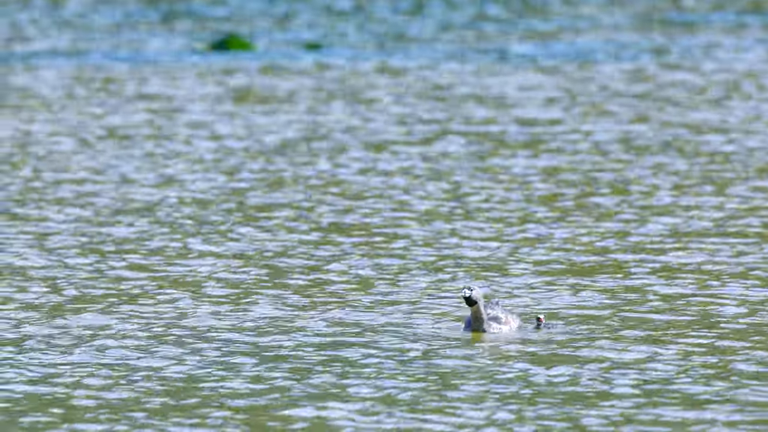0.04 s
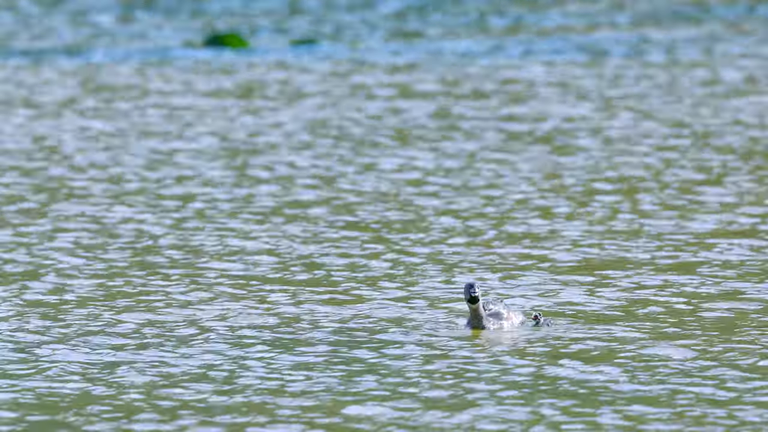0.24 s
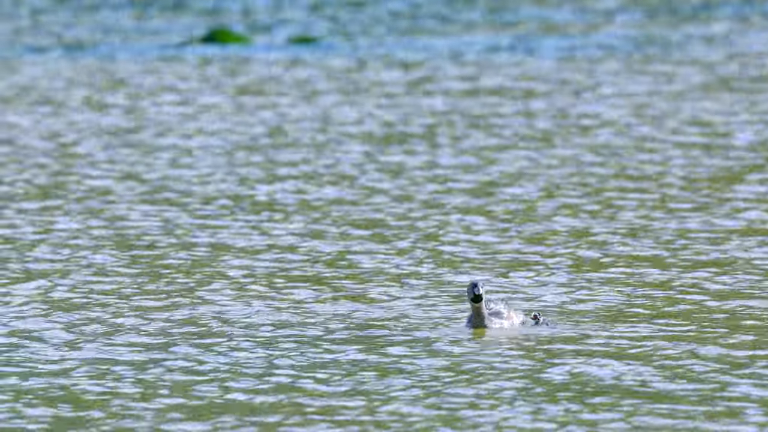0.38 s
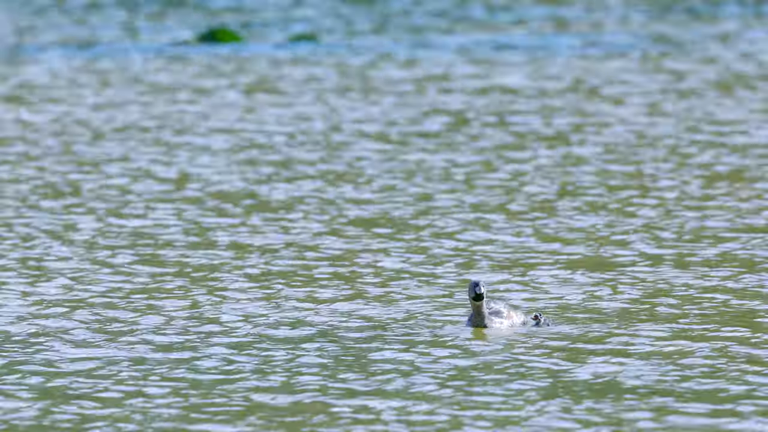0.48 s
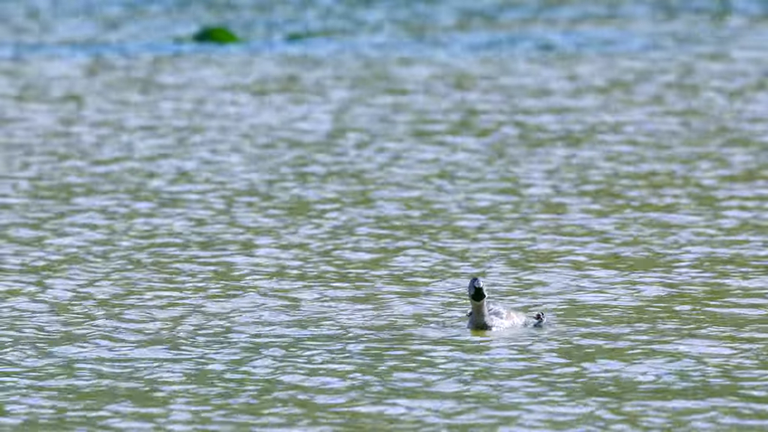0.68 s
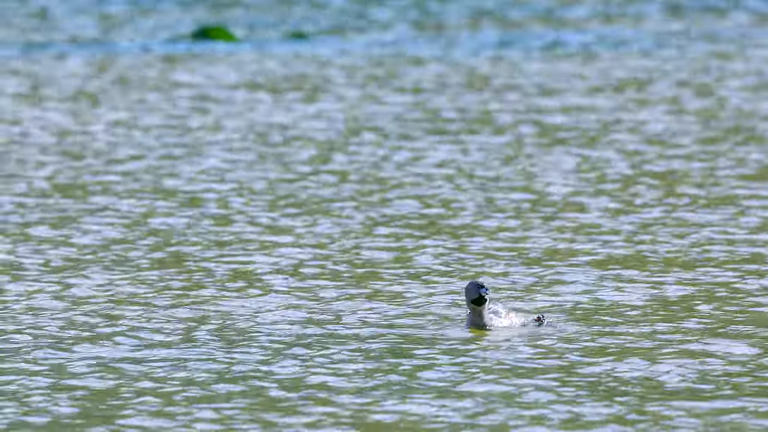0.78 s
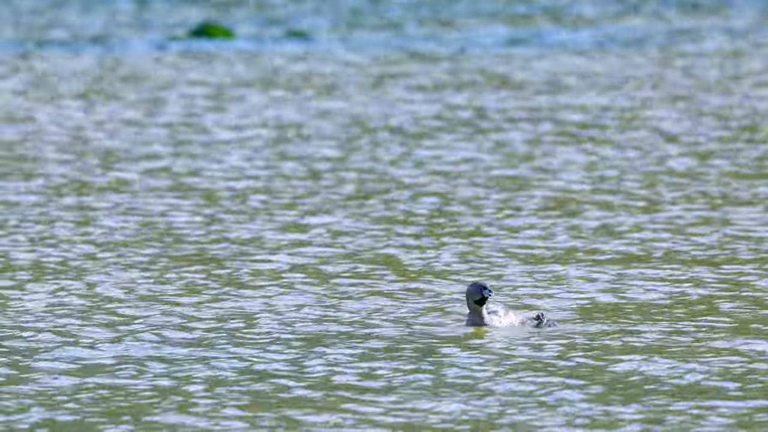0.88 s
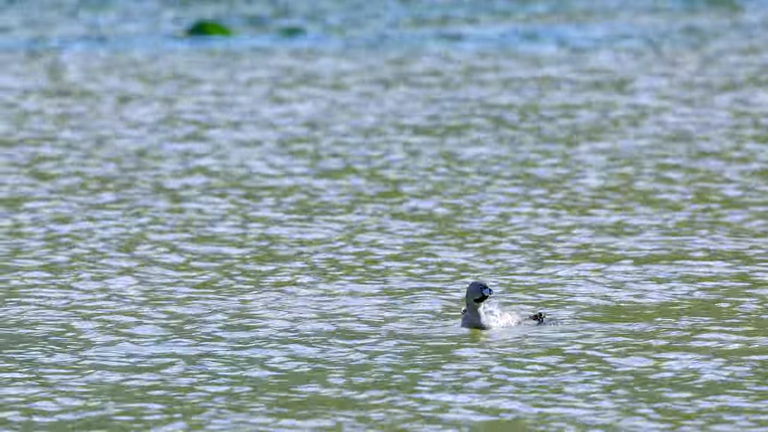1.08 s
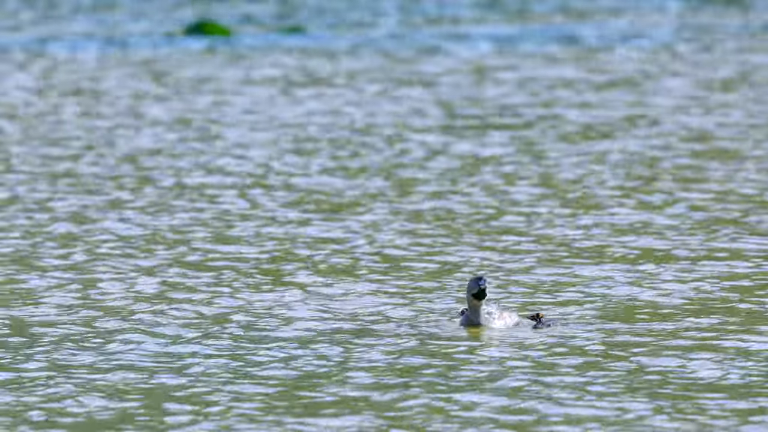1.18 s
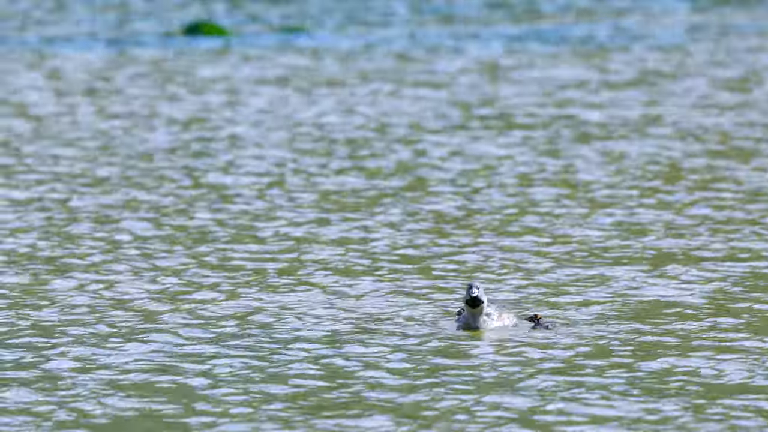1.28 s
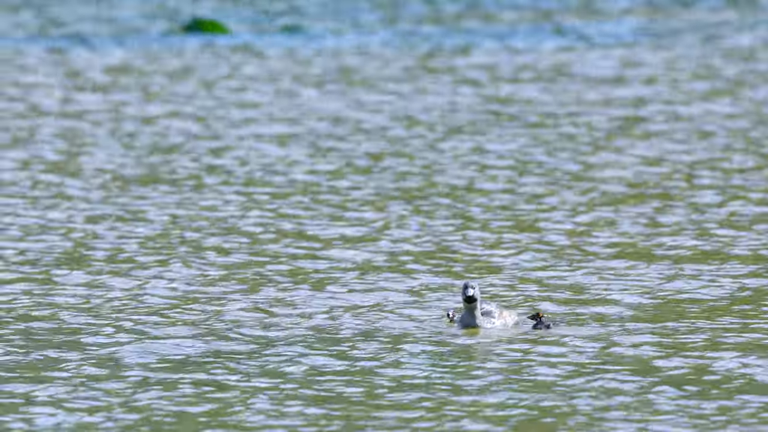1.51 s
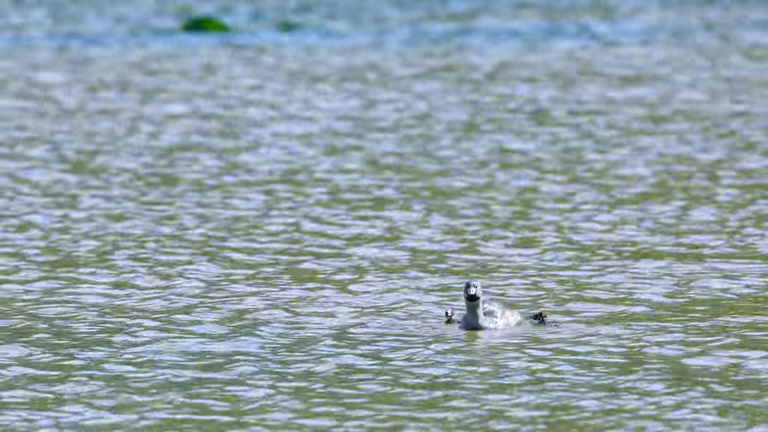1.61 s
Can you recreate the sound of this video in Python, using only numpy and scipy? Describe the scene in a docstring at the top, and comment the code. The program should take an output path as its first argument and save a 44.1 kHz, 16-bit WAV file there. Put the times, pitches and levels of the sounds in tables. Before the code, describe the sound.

A waterbird honks three times, each honk breaking into a rasp, over soft lake ripples.

```python
"""A waterbird calls three times on an open lake: a hollow, almost pure honk each time, breaking
into a falling rasp or into a rasp and a low croak. The honk is a tone with weak overtones; rasp
and croak are uneven syrinx pulses ringing the throat. Behind them: small splashes, faint chirps
of far songbirds, a soft wash of wind and ripples and a thin electrical whine."""
import sys
import numpy as np
from scipy import signal
from scipy.fft import rfft, irfft
from scipy.io import wavfile
from scipy.ndimage import uniform_filter1d

SR = 44100
rng = np.random.default_rng(int(sys.argv[2]) if len(sys.argv) > 2 else 0)


def unload_wav(signal):
    """Save mono or channel-first audio to the path in sys.argv[1] as 16-bit WAV at rate SR, clipped to [-1, 1]."""
    wavfile.write(
        sys.argv[1],
        SR,
        np.round(np.clip(np.atleast_2d(signal).T, -1, 1) * 32767).astype(np.int16),
    )


N = 72765


# One curve per honk: t/s, f/Hz, level/dB, 2nd harmonic/dB, step per higher harmonic/dB
HONK_CURVES = [
    [(.2155, 830, -46, -52, -6), (.218, 850, -30, -44, -6), (.221, 868, -21.5, -40, -8),
     (.228, 890, -13.4, -39, -7), (.237, 901, -10.1, -35.5, -7), (.246, 902, -9.3, -33.5, -8),
     (.256, 878, -11.9, -34, -1.5), (.267, 826, -21.4, -34, 1.4), (.274, 808, -31, -38, -2),
     (.282, 800, -46, -52, -3)],
    [(.781, 750, -44, -56, -6), (.789, 795, -27, -41, -8), (.797, 820, -21, -45, -5),
     (.803, 935, -19.3, -42, -7), (.812, 918, -20, -38, -6), (.824, 875, -21.5, -42, -3),
     (.831, 825, -27, -46, -6), (.846, 820, -33, -58, -6), (.857, 815, -42, -62, -6)],
    [(1.253, 770, -44, -56, -6), (1.261, 805, -25.5, -43, -7), (1.268, 815, -21.7, -45, -7),
     (1.274, 835, -26, -52, -5), (1.278, 1000, -20.5, -36, -8), (1.291, 965, -22.5, -32, -14),
     (1.304, 890, -25.5, -46, -8), (1.313, 840, -35, -52, -6), (1.322, 800, -44, -60, -6)],
]

def honk(curve, cutoff_hz=3700, jitter=0.0055, shimmer=0.15):
    """A strong fundamental that jumps up and sags, with weak, slightly unsteady overtones."""
    start_s, (hz, db, second_db, step_db) = controls(curve)
    phase = 2 * np.pi * np.cumsum(hz * (1 + jitter * wobble(len(hz), rate_hz=890))) / SR
    tone = amp(db) * np.sin(phase)
    for k in range(2, 8):
        gain = amp(second_db + (k - 2) * step_db) / (1 + (k * hz / cutoff_hz) ** 24)
        flutter = 1 + shimmer * wobble(len(hz), rate_hz=140)
        tone += gain * flutter * np.sin(k * phase)
    return start_s, np.sqrt(2) * tone


# One curve per rasp: t/s, f/Hz, level/dB
RASP_CURVES = [
    [(.322, 570, -47), (.334, 535, -39), (.338, 525, -31), (.352, 485, -28), (.359, 465, -30.5),
     (.365, 440, -25.5), (.373, 425, -33), (.382, 410, -48)],
    [(.966, 620, -48), (.979, 570, -38), (.990, 475, -37), (1.003, 430, -28), (1.012, 410, -35.5),
     (1.032, 380, -49)],
    [(1.281, 640, -40), (1.299, 605, -30), (1.310, 490, -29.5), (1.318, 430, -26.5), (1.327, 390, -29),
     (1.333, 380, -38), (1.345, 370, -48)],
]
# One row per rasp: roughness, tilt/(dB/octave), bill gain/dB, bill start f/Hz, bill end f/Hz
RASP_TIMBRES = [(0.57, 0.2, 0.5, 2840, 2560), (0.54, 0, 0.5, 1930, 2550), (0.23, -.5, 4, 2370, 2150)]
# Throat response: f/Hz, relative gain/dB
RASP_THROAT_EQ = [(200, -28), (480, -5.5), (700, -5.5), (1000, -5.5), (1300, -1), (1800, -8), (2200, 0.5),
                  (2620, -3.5), (2850, -4.5), (3150, -23), (3850, -21), (4600, -36), (15000, -61)]

def rasp(curve, roughness, tilt_db_oct, bill_db, bill_start_hz, bill_end_hz):
    """Rough falling pulses through a bright throat and the gliding resonance of the open bill."""
    start_s, (hz, db) = controls(curve)
    throat = [(f, gain_db + tilt_db_oct * np.log2(f)) for f, gain_db in RASP_THROAT_EQ]
    pulses = syrinx(hz, jitter=0.091 * roughness, roughness=roughness)
    voice = colour(pulses, throat)
    bill_hz = np.linspace(bill_start_hz, bill_end_hz, len(hz))
    bill = resonate(voice, bill_hz, width_hz=390).real
    return start_s, amp(db) * unit(voice + amp(bill_db) * bill)


# One curve per croak: t/s, f/Hz, level/dB, throat resonance f/Hz
CROAK_CURVES = [
    [(.846, 245.5, -48, 674), (.861, 234.8, -27, 585), (.878, 241, -28, 546), (.895, 247, -30, 577),
     (.910, 212, -26.5, 606), (.923, 204, -33.5, 656), (.934, 167, -36, 523), (.946, 171, -78, 560)],
    [(1.318, 238.5, -32.5, 730), (1.335, 239.9, -31.5, 580), (1.360, 247.5, -28, 550),
     (1.380, 240, -29, 566), (1.398, 208.8, -27.5, 633), (1.407, 211, -36.5, 606), (1.417, 192, -39, 596)],
]
# Throat response around that resonance: f/Hz, relative gain/dB
CROAK_THROAT_EQ = [(100, -14), (230, -0.5), (500, 0.5), (1200, -0.5), (1700, 6.5), (2700, -11), (5000, 8),
                   (8000, -25)]

def croak(curve):
    """Slow pulses ring one low, moving throat resonance."""
    start_s, (hz, db, throat_hz) = controls(curve)
    pulses = syrinx(hz, jitter=0.014, roughness=0.22)
    ring = resonate(pulses, throat_hz, width_hz=78).imag
    return start_s, amp(db) * unit(colour(ring, CROAK_THROAT_EQ))


def syrinx(hz, jitter, roughness):
    """Uneven pulses of the bird's voice organ, each with a puff of noise."""
    cycles = np.cumsum(hz * (1 + jitter * wobble(len(hz), rate_hz=200))) / SR
    buzz = sum(np.cos(2 * np.pi * k * cycles) for k in range(1, 32))
    puffs = (0.18 + np.exp(-(cycles % 1) / 0.65)) * noise(len(hz))
    return unit(unit(buzz) + 2 * roughness * unit(puffs))


# Small splashes: t/s, rise/s, decay/s, level/dB
SPLASHES = [(.098, 0.007, 0.011, -39), (0.817, 0.0026, 0.0047, -35.5), (0.888, 0.0019, 0.0053, -34.5),
            (.935, 0.0016, 0.0079, -38)]
# Splash spectrum: f/Hz, relative level/dB
SPLASH_EQ = [(100, -14.5), (300, -5), (1000, 5.5), (1700, 2.5), (2700, 4), (3400, -21.5), (5000, -12),
             (8000, -32.5), (15000, -48.5)]

def splash(start_s, rise_s, decay_s, db):
    """Lapping water: a soft noise burst that rises, holds and decays."""
    t = np.arange(SR // 2) / SR
    attack = np.minimum(t / rise_s, 1)
    decay = np.exp(-np.maximum(t - 2 * rise_s, 0) / decay_s)
    return start_s, amp(db) * attack * decay * unit(colour(noise(len(t)), SPLASH_EQ))


# Songbird chirps: t/s, length/s, start f/Hz, end f/Hz, level/dB, waver/fraction of pitch
SONGBIRD_CHIRPS = [(0.065, 0.087, 5350, 5290, -54, 0.0024), (.09, 0.13, 5590, 5660, -61, 0.019),
                   (.215, .05, 5430, 5270, -58, .005), (.42, 0.067, 2620, 2980, -50, .005),
                   (0.492, 0.14, 6900, 7160, -68, .012), (.61, 0.027, 3620, 3370, -53, .008),
                   (.658, 0.033, 5080, 4420, -58, 0.0065), (0.686, 0.083, 3550, 3460, -51, 0.0027),
                   (0.689, 0.072, 4020, 4000, -57, .004), (0.921, 0.06, 4580, 3500, -53, 0.046),
                   (1.14, .05, 4410, 3880, -50, 0.052), (1.161, 0.11, 2496, 3090, -49.5, 0.011),
                   (1.363, 0.038, 3880, 4010, -51, 0.0053), (1.37, 0.19, 3540, 3500, -56, 0.0176),
                   (1.543, 0.036, 2840, 2690, -50, .008), (1.595, 0.0547, 4370, 3570, -54.5, .018)]

def chirp(start_s, length_s, start_hz, end_hz, db, waver):
    """A far songbird's thin, wavering glide."""
    progress = np.arange(0, length_s, 1 / SR) / length_s
    glide_hz = start_hz + (end_hz - start_hz) * progress
    hz = glide_hz * (1 + waver * wobble(len(progress), rate_hz=99))
    envelope = amp(db) * np.sin(np.pi * progress)
    return start_s, envelope * np.sqrt(2) * np.sin(2 * np.pi * np.cumsum(hz) / SR)


def shore_echo(x, db, t60_s, delay_s=0.014):
    """Weak, short scatter from water and bank."""
    t = np.arange(SR // 2) / SR
    tail = noise(len(t)) * amp(-60 * t / t60_s) * (t > delay_s)
    return amp(db) * signal.fftconvolve(x, tail / np.linalg.norm(tail))[:N]


# Wind and ripple spectrum: f/Hz, relative density/dB
WASH_SPECTRUM = [(25, -49.5), (60, -23.5), (120, -2.5), (180, -1.5), (270, 1.5), (340, -6), (440, -10),
                 (650, -8), (870, -6.5), (1400, -13.5), (1800, -10.5), (2450, -11), (3100, -16),
                 (3700, -17.5), (6000, -26.5), (9000, -32), (15500, -37)]
# Stereo image: f/Hz, left-right correlation
WASH_CORRELATION = [(30, 0.91), (250, .97), (1200, 1), (2500, 0.98), (5000, 1), (9000, .55), (14000, .43)]

def wind_and_ripples(db=-42.5, patch_db=1.38, flicker_db=0.26):
    """A wash of noise with drifting patches, nearly mono below the treble."""
    frames, hz = N // 256 + 5, np.fft.rfftfreq(1024, 1 / SR)
    mid_re, mid_im, side_re, side_im, patches = rng.standard_normal((5, frames, len(hz)))
    patches = uniform_filter1d(patches, size=10, axis=0)
    patches = unit(uniform_filter1d(patches, size=8, axis=1))
    flicker = rng.standard_normal((frames, 1))
    correlation = np.clip(read(WASH_CORRELATION, hz), 0, 0.999)
    mid = np.sqrt(1 + correlation) * (mid_re + 1j * mid_im)
    side = np.sqrt(1 - correlation) * (side_re + 1j * side_im)
    gain = amp(read(WASH_SPECTRUM, hz) + patch_db * correlation * patches + flicker_db * flicker)
    spectra = np.array([mid + side, mid - side]) * gain
    _, wash = signal.istft(spectra.transpose(0, 2, 1), nperseg=1024, noverlap=768)
    return amp(db) * unit(wash[:, :N])


# Steady tones: f/Hz, level/dB
WHINE_TONES = [(885, -60), (1222, -60), (4522, -68), (5092, -68.5), (9078, -74.5), (9648, -78),
               (11892, -76.5)]

def whine():
    """Faint steady tones, mostly a thin electrical whine."""
    t = np.arange(N) / SR
    tones = (amp(db) * np.sin(2 * np.pi * (hz * t + rng.random())) for hz, db in WHINE_TONES)
    return np.sqrt(2) * sum(tones)


def amp(db):
    """Decibels to gain."""
    return 10 ** (np.asarray(db) / 20)


def unit(x):
    """Scales to rms 1."""
    return x / np.sqrt(np.mean(x ** 2) + 1e-20)


def read(points, hz):
    """Interpolates (f/Hz, value) points on a log-frequency axis."""
    f, value = np.transpose(points)
    return np.interp(np.log(hz + 1), np.log(f + 1), value)


def controls(curve):
    """Start time and per-sample columns of a curve."""
    times_s, *columns = np.transpose(curve)
    t = np.arange(times_s[0], times_s[-1], 1 / SR)
    return times_s[0], [np.interp(t, times_s, column) for column in columns]


def add(mix, start_s, sound):
    """Mixes a sound in at its start time."""
    part = mix[max(round(start_s * SR), 0):][:len(sound)]
    part += sound[:len(part)]


def noise(size):
    """White noise."""
    return rng.standard_normal(N)[:size]


def wobble(size, rate_hz):
    """Smooth random motion up to a rate."""
    rolloff = 1 + (np.fft.rfftfreq(N, 1 / SR) / rate_hz) ** 4
    return unit(irfft(rfft(noise(N)) / rolloff, N))[:size]


def colour(x, eq):
    """Minimum-phase filter: its peaks ring on after each pulse."""
    log_gain = np.log(amp(read(eq, abs(np.fft.fftfreq(SR, 1 / SR)))))
    response = np.exp(np.conj(signal.hilbert(log_gain)))
    taps = np.fft.ifft(response).real[:2048]
    return signal.fftconvolve(x, taps)[:len(x)]


def resonate(x, hz, width_hz):
    """Moving resonance of gain 1; complex, so either phase can be taken."""
    carrier = np.exp(2j * np.pi * np.cumsum(hz) / SR)
    pole = np.exp(-np.pi * width_hz / SR)
    return 2 * carrier * signal.lfilter([1 - pole], [1, -pole], x / carrier)


def scene():
    """The bird straight ahead, the lake all around."""
    near, far = np.zeros(N), np.zeros(N)
    for curve in HONK_CURVES:
        add(near, *honk(curve))
    for curve, timbre in zip(RASP_CURVES, RASP_TIMBRES):
        add(near, *rasp(curve, *timbre))
    for curve in CROAK_CURVES:
        add(near, *croak(curve))
    for row in SPLASHES:
        add(near, *splash(*row))
    for row in SONGBIRD_CHIRPS:
        add(far, *chirp(*row))
    near += shore_echo(near, db=-27.5, t60_s=0.18)
    far += shore_echo(far, db=-8, t60_s=0.37)
    return near + far + wind_and_ripples() + whine()


def record(dry):
    """Steep low-pass at 15.7 kHz."""
    taps = signal.firwin(511, 15700, window=("kaiser", 9), fs=SR)
    return signal.oaconvolve(dry, taps[None], "same")


dry = scene()
out = record(dry)
unload_wav(out)
```